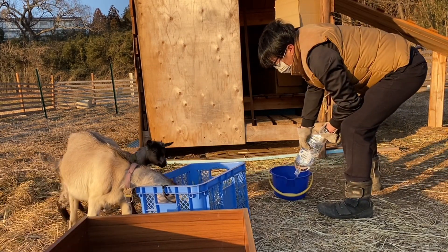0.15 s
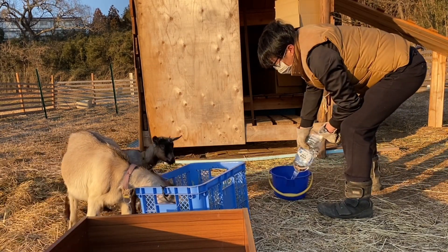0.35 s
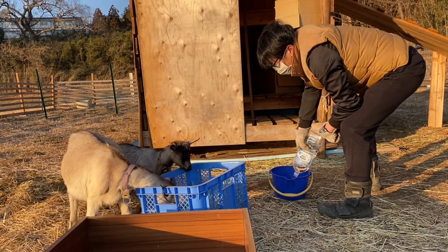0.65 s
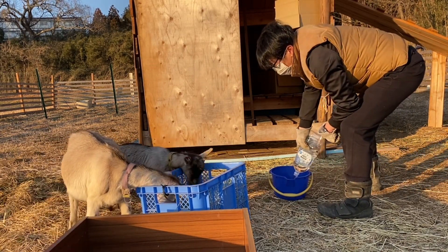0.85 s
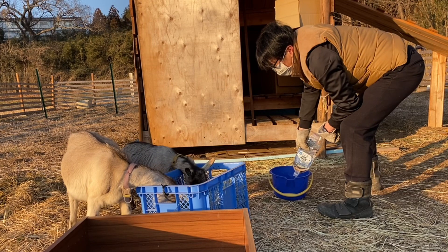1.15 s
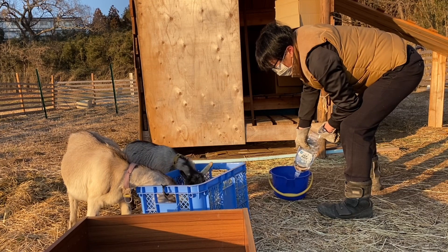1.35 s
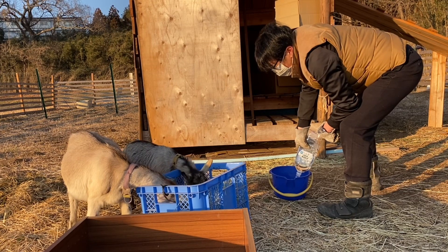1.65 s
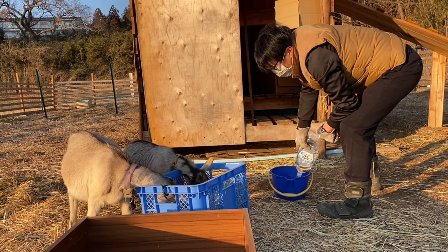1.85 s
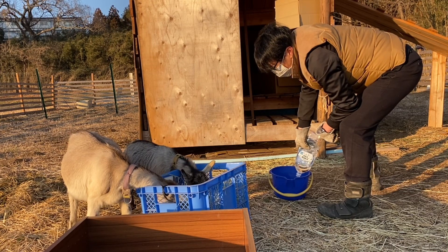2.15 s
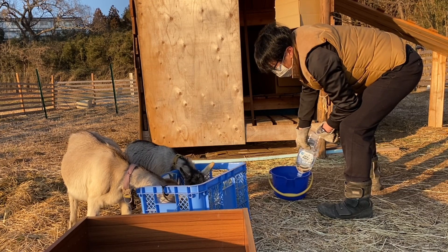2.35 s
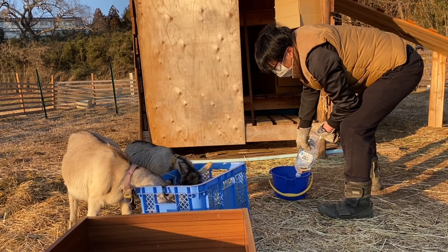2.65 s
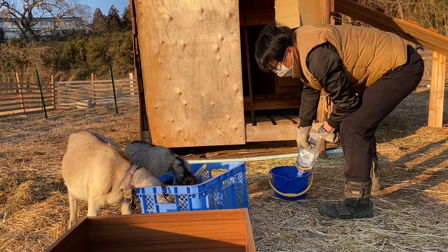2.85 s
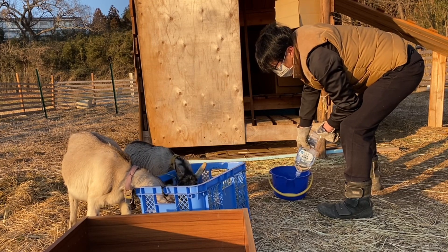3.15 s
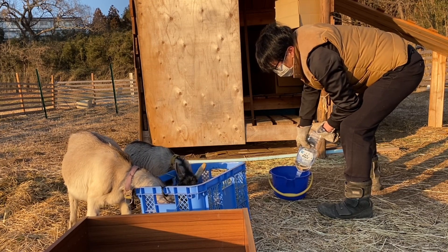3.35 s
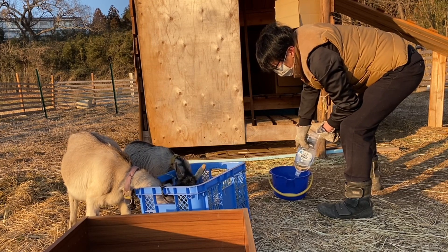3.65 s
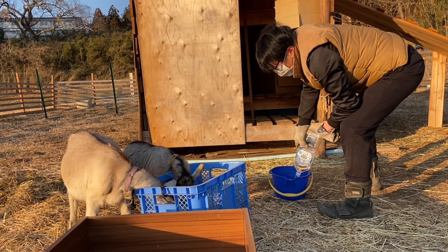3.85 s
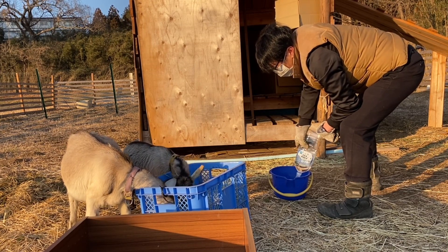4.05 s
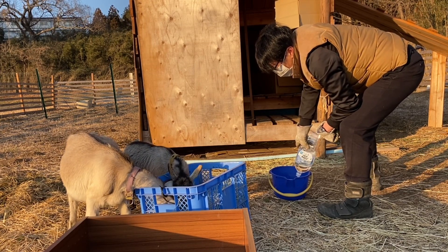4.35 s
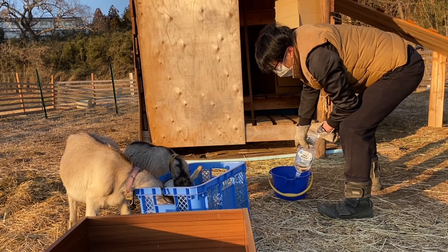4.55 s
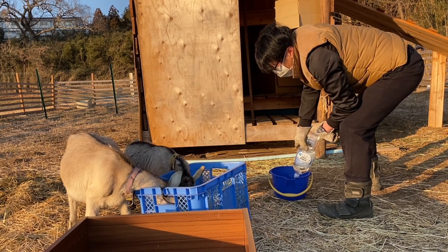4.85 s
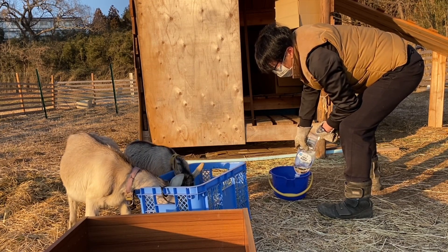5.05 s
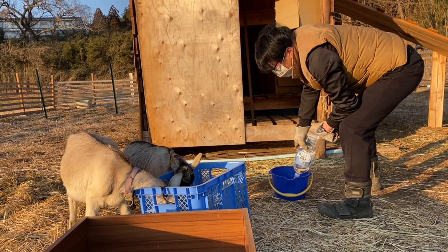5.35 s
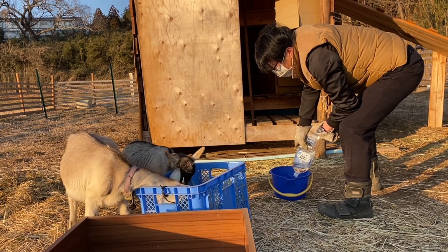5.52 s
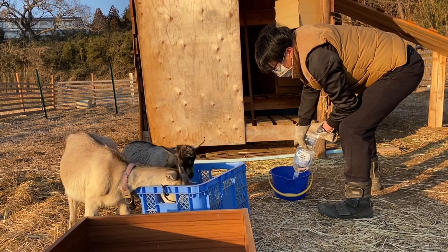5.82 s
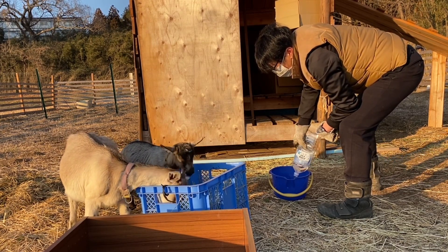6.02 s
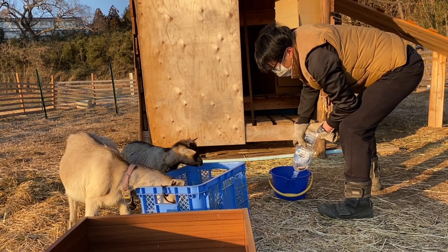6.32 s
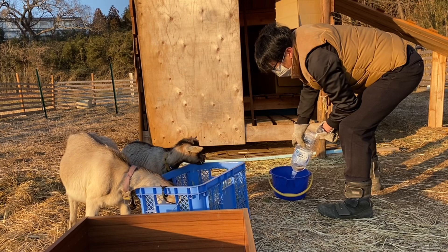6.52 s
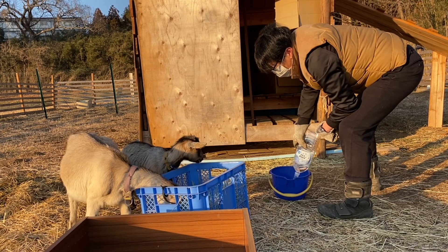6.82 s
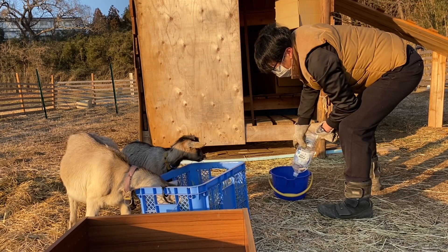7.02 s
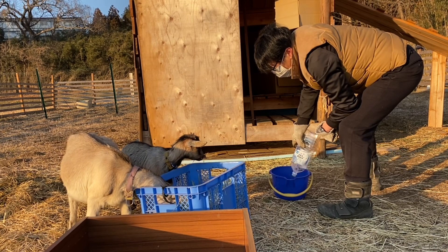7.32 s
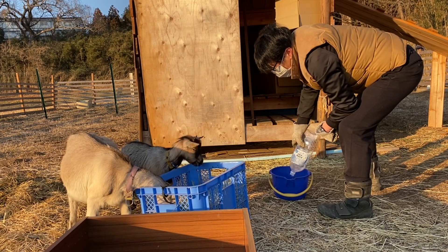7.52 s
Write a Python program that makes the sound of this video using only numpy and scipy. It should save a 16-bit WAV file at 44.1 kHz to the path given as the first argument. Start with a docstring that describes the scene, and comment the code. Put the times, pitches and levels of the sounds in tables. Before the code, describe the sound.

Close outdoor sound of water leaving an upturned plastic bottle into a plastic bucket. Single hollow glugs come first, then quicken into a dense, irregular run of gulps with sharp plastic pops, one hard crack near three seconds, splashes, bubbly bloops and high plinks. After six seconds it thins to spaced soft gulps and drips. Faint low open-air rumble, short reflections from a wooden shed, stereo.

```python
"""A plastic bottle, held upside down, glugs water into a plastic bucket outdoors beside a plywood shed.
At each glug the thin wall snaps (cracking noise, a falling pop) and air rings in the neck as a wobbling tone.
Bubble tones and filtered noise make the splashing stream, drips and bloops; ticking noise makes plastic crinkle.
Short reflections come from ground and shed, over shaped noise for the rumble of open air and a few low thuds."""
import sys
import numpy as np
from scipy import signal
from scipy.fft import rfft, irfft
from scipy.io import wavfile
from scipy.ndimage import uniform_filter1d

SR = 44100
rng = np.random.default_rng(int(sys.argv[2]) if len(sys.argv) > 2 else 0)


def log_audio(samples):
    """Write samples as a 16-bit WAV file to the path given in sys.argv[1]."""
    # one column per channel
    frames = np.atleast_2d(samples).T
    # limit to full scale, then quantise
    limited = np.clip(frames, -1, 1)
    pcm = np.round(limited * 32767).astype(np.int16)
    wavfile.write(sys.argv[1], SR, pcm)


N = 338688
TIME = np.arange(N) / SR
RING = TIME[:SR // 3]  # the time axis of one short sound

# Levels in the tables are relative: each function adds its own trim in dB.
# glugs, the wall snaps and air breaks in:
# [t/s, snap level/dB, snap f/Hz, crack level/dB, pocket level/dB, pocket f/Hz, bottle body level/dB]
GLUG_EVENTS = [(0.37, -31, 1440, -71, -38, 495, -51), (0.697, -43, 1000, -43, -63, 444, -68),
               (0.897, -49, 840, -74, -47.5, 500, -54.5), (1.189, -43, 1100, -50.5, -41, 530, -50.5),
               (1.469, -42, 1310, -48.5, -36.5, 522, -56.5), (1.516, -44.5, 850, -48.5, -40, 533, -50.5),
               (1.761, -37.5, 1460, -57, -74, 586, -56), (1.827, -50, 900, -57, -40.5, 370, -54.5),
               (1.958, -48, 1810, -48.5, -61, 444.4, -57.5), (2.059, -50.5, 2010, -44, -39.5, 427, -56),
               (2.324, -42.5, 1050, -42.5, -46.5, 462, -80), (2.435, -38, 1440, -63, -45, 714, -48),
               (2.552, -45, 830, -45, -41, 400, -52), (2.662, -49.5, 2420, -64, -37, 450, -45.5),
               (2.915, -35, 1320, -48, -45, 437, -51), (3.017, -44.5, 1310, -52, -33, 487, -48.5),
               (3.0484, -21.5, 2570, -21, -46, 382.3, -49), (3.148, -35, 1050, -50, -38, 337, -51),
               (3.2, -41, 1550, -49.5, -47, 460, -59), (3.228, -33, 1660, -47, -36.5, 360, -48.5),
               (3.3046, -27.5, 1590, -68, -73, 400, -56), (3.427, -40.5, 1250, -40.5, -41.5, 392, -46.5),
               (3.506, -34.5, 940, -50, -32, 597, -44.5), (3.674, -39.5, 1140, -63, -38, 355, -49),
               (3.765, -35, 860, -49, -29.5, 514, -46), (3.92, -39, 840, -40.5, -41, 365, -51),
               (4.011, -31.5, 1200, -46.5, -43, 440, -43.5), (4.119, -34, 1190, -37, -41, 473, -51),
               (4.206, -37, 1110, -43, -35.5, 355, -49), (4.352, -42, 850, -41, -41, 357, -45.5),
               (4.435, -27, 1300, -33.5, -30, 350, -43.5), (4.579, -34.5, 850, -44, -40.5, 375, -47.5),
               (4.647, -31, 820, -36, -25.5, 335, -42.5), (4.804, -31.5, 1790, -38.5, -40.5, 437, -48),
               (4.865, -29, 1463, -36, -29.5, 416, -39), (5.037, -38, 840, -39, -39.5, 420, -40),
               (5.108, -24, 1190, -35.5, -30.5, 377, -42), (5.267, -43, 1030, -51.5, -36, 460, -40),
               (5.512, -38, 1100, -53, -37, 463, -43.5), (5.563, -26.5, 1070, -29.5, -32, 456, -40.5),
               (5.736, -35, 870, -71, -34.5, 490, -39.5), (5.956, -53, 890, -52, -42, 360, -48.5),
               (5.987, -32.5, 850, -53, -30.5, 430, -40.5), (6.227, -63, 2460, -45, -40.5, 498, -51),
               (6.7, -56, 860, -44, -37.5, 522, -50), (6.982, -56, 1120, -46, -31.5, 494, -57.5),
               (7.254, -52, 864, -40, -32, 478, -49), (7.507, -54, 1080, -47, -42, 524, -54.5)]
# tone colour of water sloshing around a bubble: [f/Hz, level/dB]
SLOSH_TONE = [(100, -36), (280, -18), (500, 7), (700, -9), (1100, -21.5), (2500, -18.5), (8000, -37)]

CRACK_LEAD_S = .0006  # the wall cracks just before it pops
SLAP_WETNESS = 0.18  # dB the slap loses per dB that the pocket is weaker than the snap
POCKET_LAG_S = 0.00204  # the pocket breaks off just after the snap
POCKET_WOBBLE, WOBBLE_HZ = 0.093, 53.3  # a fresh pocket changes shape: share of its pitch, rate
# a weaker pocket follows, typically at a slightly lower pitch: typical delay, level, typical pitch ratio
SECOND_POCKET_S, SECOND_POCKET_DB, SECOND_POCKET_PITCH_RATIO = .038, -18, 0.97
BODY_ATTACK_S = 0.0025  # the heavy bottle takes a moment to swing
# water let out per glug: level for a 0 dB snap, dB per dB of snap, delay, half length
SLUG_DB, SLUG_GROWTH, SLUG_LAG_S, SLUG_HALF_S = -42, 0.36, 0.016, 0.024
CHURN_S = 0.024  # stirred water goes on gurgling after a slug
CHURN_KEEP = np.exp(-1 / (CHURN_S * SR))  # share of the churning left after one sample
# thrown droplets: level of the earliest against the snap, longest flight, lowest and highest pitch
FLUNG_DB, FLUNG_S, FLUNG_LOW_HZ, FLUNG_HIGH_HZ = -18, .075, 1530, 4630
DROP_GLIDE, DROP_GLIDE_SCATTER = .03, .06  # bend in pitch: average and spread, as natural log of a ratio
DROP_ECHO_S, DROP_ECHO_DB = 0.011, -16  # the shed wall answers each plink
RUMBLE_SWING_DB, RUMBLE_SWINGS_PER_S = 3.5, 7.7  # spread and rate of the random changes in level
TOP_HZ = 16300


def undb(db):
    """Turn decibels into gain, the number a sound is multiplied by."""
    return 10 ** (np.asarray(db) / 20)


def unit(x):
    """Scale a sound to an average strength (rms) of 1."""
    return x / np.sqrt(np.mean(x ** 2))


def add(track, s, sound):
    """Mix a sound into a track at time s."""
    i = max(int(s * SR), 0)
    track[i:i + len(sound)] += sound[:max(N - i, 0)]


def gains(points, size):
    """Draw lines between (f/Hz, level/dB) points to get a gain for each frequency of a spectrum."""
    hz, db = np.transpose(points)
    return undb(np.interp(np.log(np.fft.rfftfreq(size, 1 / SR) + 1), np.log(hz), db))


def colour(x, points):
    """Filter a sound by an outline of (f/Hz, level/dB) points."""
    return irfft(rfft(x) * gains(points, len(x)), len(x))


def walk(rate):
    """Wander smoothly at random, with a spread near 1."""
    k = int(SR / rate)
    steps = np.repeat(rng.standard_normal(N // k + 1), k)
    return unit(uniform_filter1d(steps, k)[:N])


def fade(t60, t=RING):
    """Die away exponentially, by 60 dB in t60 seconds."""
    return np.exp(-np.log(1000) * t / t60)


def bubble(hz, t60, glide, glide_s, attack_s, t=RING):
    """A pocket of air rings; its pitch starts off by the factor exp(-glide) and settles."""
    pitch = hz * np.exp(-glide * np.exp(-t / glide_s))
    tone = np.sin(2 * np.pi * np.cumsum(pitch) / SR)
    return tone * fade(t60, t) * (1 - np.exp(-(t / attack_s) ** 2))


def snaps(ring_db=8, slap_db=0, slap_scatter=0.16, ragged_db=6.5, crack_db=6, crinkle_db=-16):
    """Pressure flips the wall: a crack, a pop that drops in pitch, a wet slap and a short crinkle."""
    # tone colour of the cracking plastic: [f/Hz, level/dB]
    crack_tone = [(300, 4.5), (1200, 6), (2800, 1), (4100, 3.5), (5500, -3), (7500, 1), (10000, -2),
                  (16000, -10.5)]
    # the wet slap darkens as it dies, band by band: [f/Hz, level/dB, typical t60/s]
    slap_bands = [(583, -13, 0.078), (860, -4, 0.064), (1390, 0.5, 0.025), (2100, 2, 0.021),
                  (3010, -5.5, 0.014), (4040, -24.5, 0.0049)]
    out = np.zeros(N)
    for s, db, hz, sharp_db, pocket_db, *_ in GLUG_EVENTS:
        ring = bubble(hz, t60=0.013, glide=-0.32, glide_s=0.0017, attack_s=0.00028)
        lengths = np.exp(slap_scatter * rng.standard_normal(len(slap_bands)))
        slap = sum(undb(band_db) * burst(band_hz, t60 * k)
                   for (band_hz, band_db, t60), k in zip(slap_bands, lengths))
        # the slap comes in uneven spurts, about 350 a second
        spurts = RING[::SR // 350]
        slap = slap * undb(ragged_db * np.interp(RING, spurts, rng.standard_normal(len(spurts))))
        slap = slap * (1 - np.exp(-RING / 0.0019))
        wet_db = slap_db + SLAP_WETNESS * min(pocket_db - db, 0)
        add(out, s, undb(db) * (undb(ring_db) * ring + undb(wet_db) * slap))

        crack = undb(crack_db) * grit(crack_tone, spread_db=2.0) * fade(0.015)
        crinkle = undb(crinkle_db) * grit(crack_tone, spread_db=3.5) * fade(0.18)
        add(out, s - CRACK_LEAD_S, undb(sharp_db) * (crack + crinkle))
    return out


def burst(hz, t60):
    """A band of noise about an octave wide that dies away."""
    band = [(hz / 2, -30), (hz / 1.2, 0), (hz * 1.2, 0), (hz * 2, -30)]
    noise = colour(rng.standard_normal(len(RING)), band)
    decay = fade(t60)
    return unit(noise * decay) * np.sqrt(np.mean(decay ** 2))


def grit(points, spread_db):
    """Dense ticks of uneven size, filtered by an outline of (f/Hz, level/dB) points."""
    sizes = undb(spread_db * np.minimum(rng.exponential(size=len(RING)), 5))
    ticks = rng.standard_normal(len(RING)) * sizes
    return unit(colour(ticks, points))


def gulps(pocket_db=8, body_db=-2, slosh_db=-8, heave_db=-3, intake_db=-13, stir_db=-9, gurgle_db=-15):
    """Air breaks off in the neck as a wobbling pocket, shaking the bottle and shedding small bubbles."""
    # the water-laden bottle swings at these pitches: [typical f/Hz, typical level/dB, t60/s]
    body_modes = [(124, 8.5, 0.21), (157.7, 10, 0.17), (201.8, 10.5, 0.14), (252, 11.5, 0.093),
                  (331.7, 9, 0.12)]
    # tone colour of the deep heave of water: [f/Hz, level/dB]
    heave_tone = [(40, -46), (85, 16.5), (160, -37), (280, 1.5), (500, -10), (1500, -70)]
    out = np.zeros(N)
    lead = int(0.041 * SR)
    for s, db, hz, low_db in pockets():
        wobble = np.exp(POCKET_WOBBLE * np.sin(2 * np.pi * (WOBBLE_HZ * RING + rng.random())))
        pocket = bubble(hz * wobble, t60=0.061, glide=0.072, glide_s=0.0064, attack_s=0.0017)
        body = modes(body_modes, scatter=0.1182) * (1 - np.exp(-RING / BODY_ATTACK_S))
        add(out, s, undb(db + pocket_db) * pocket + undb(low_db + body_db) * body)

        slosh = unit(colour(rng.standard_normal(len(RING)), SLOSH_TONE))
        heave = unit(colour(rng.standard_normal(len(RING)), heave_tone))
        water = undb(db + slosh_db) * slosh + undb(low_db + heave_db) * heave
        add(out, s, water * fade(0.15) * (1 - np.exp(-RING / 0.0004)))

        # the water already stirs while the pocket is forming: a backwards fade
        stir = undb(intake_db) * water + undb(low_db + stir_db) * heave
        add(out, s - lead / SR, (stir * fade(0.11))[:lead][::-1])

        for late, size, strength in rng.random((5, 3)):
            small_hz = 550 * 4 ** size
            small = bubble(small_hz, t60=45 / small_hz, glide=0.307, glide_s=0.03, attack_s=0.0072)
            add(out, s + 0.0053 + 0.036 * late, undb(db + gurgle_db - 10 * late) * strength * small)
    return out


def pockets():
    """Each glug lets in an air pocket, then a weaker one: (t/s, level/dB, f/Hz, bottle body level/dB)."""
    chance = rng.standard_normal((len(GLUG_EVENTS), 2))
    for (s, *_, db, hz, low_db), (late, detune) in zip(GLUG_EVENTS, chance):
        yield s + POCKET_LAG_S, db, hz, low_db
        yield (s + SECOND_POCKET_S * np.exp(.15 * late), db + SECOND_POCKET_DB,
               hz * SECOND_POCKET_PITCH_RATIO * np.exp(0.11 * detune), low_db + SECOND_POCKET_DB)


def modes(table, scatter):
    """A struck body rings at several pitches; the shifting water changes them and their levels each time."""
    total = 0
    for (hz, db, t60), (a, b, c) in zip(table, rng.standard_normal((len(table), 3))):
        tone = np.sin(2 * np.pi * hz * np.exp(scatter * a) * RING)
        total = total + np.sign(c) * undb(db + 2 * b) * tone * fade(t60)
    return total


def stream(trickle_db=-1.5, slug_db=-2, wash_db=-9, gurgle_db=-8.5, spray_db=3, slug_spray_db=-13,
           flutter_db=2, sputter_db=2.5):
    """Falling water churns up bubbles and throws a fine spray; each slug makes both swell and leaves a gurgle."""
    # the thin stream between the slugs: [t/s, trickle level/dB, fine spray level/dB]
    stream_levels = [(0.0, -61, -74), (0.3, -63.5, -68.5), (0.75, -64, -66), (0.9, -62.5, -68.5),
                     (1.281, -60, -70.5), (1.56, -62.5, -75), (2.12, -55.5, -64.5), (2.7, -57.5, -68),
                     (2.86, -62.5, -68.5), (3.101, -54, -68.5), (3.38, -60, -73), (3.52, -55, -69),
                     (3.7, -58, -66), (3.84, -63.5, -73), (4.021, -60.5, -66.5), (5.05, -57.5, -69.5),
                     (5.33, -62, -64), (5.6, -56.5, -61), (5.819, -63, -64.5), (6.05, -62, -77),
                     (6.39, -67, -68), (6.89, -64, -69), (7.68, -66, -72.5)]
    # tone colours of the splash, the spray and the gurgle: [f/Hz, level/dB]
    splash_tone = [(120, -19), (200, 2.5), (549, -11), (680, -15), (1220, -9), (1350, -14), (2090, -10),
                   (4850, -21), (6000, -27), (7800, -16), (13200, -120)]
    spray_tone = [(1800, -22), (3500, 18.5), (5000, 15.5), (7000, 12.5), (11000, 18.5), (16000, 16)]
    gurgle_tone = [(600, 3), (1400, -1), (3200, -4)]
    s, *columns = np.transpose(stream_levels)
    trickle, mist = (undb(np.interp(TIME, s, c) + sputter_db * walk(24)) for c in columns)
    swell = slugs()
    thin = undb(trickle_db) * trickle
    fizz = bubble_cloud(thin, count=7000, low_hz=378, high_hz=7710, cycles=34)
    fizz = unit(colour(fizz, splash_tone))
    flow = np.hypot(undb(-18) * thin, undb(slug_db) * swell)
    cloud = bubble_cloud(flow, count=3500, low_hz=384.7, high_hz=7490, cycles=33.5)
    cloud = unit(colour(cloud, splash_tone))
    wash = unit(colour(rng.standard_normal(N), splash_tone))
    ticks = rng.standard_normal(N) * undb(3.5 * np.minimum(rng.exponential(size=N), 7))
    # the churning follows the flow but dies down slowly
    churn = signal.lfilter([1 - CHURN_KEEP], [1, -CHURN_KEEP], flow)
    gurgle = bubble_cloud(churn, count=1800, low_hz=512, high_hz=3210, cycles=53)
    gurgle = unit(colour(gurgle, gurgle_tone))
    splash = thin * (fizz + undb(-6.5) * wash)
    splash += flow * (cloud + undb(wash_db) * wash)
    splash += undb(gurgle_db) * churn * gurgle
    spray_level = np.hypot(undb(spray_db) * mist, undb(slug_spray_db) * swell)
    spray = spray_level * unit(colour(ticks, spray_tone))
    return (splash + spray) * undb(flutter_db * walk(130))


def slugs():
    """Strength of the water landing over time: a small slug after every glug, and the big ones."""
    # the biggest slugs of water land in the bucket: [centre t/s, level/dB, half length/s]
    big_slugs = [(0.032, -47.5, 0.013), (0.371, -38, 0.0045), (0.491, -53.5, 0.082), (0.829, -45.5, 0.018),
                 (0.871, -46, 0.014), (0.961, -49, 0.013), (1.158, -46, 0.036), (1.486, -45, .01),
                 (1.705, -51, .01), (1.734, -46, .008), (1.765, -42, .009), (1.837, -48.5, .014),
                 (2.264, -48, 0.014), (2.437, -43, .018), (2.478, -44, 0.018), (2.666, -46, 0.025),
                 (2.762, -46, 0.013), (2.933, -47, 0.025), (3.022, -37.5, 0.013), (3.228, -44, 0.013),
                 (3.469, -43.5, .023), (3.736, -50, 0.023), (3.982, -45.5, 0.019), (4.216, -48, 0.018),
                 (4.433, -40, .007), (5.416, -47, 0.0059), (5.527, -41, .03), (5.614, -48.5, .019),
                 (6.02, -48, .035), (6.475, -49.5, 0.012), (6.961, -49.5, 0.029), (7.258, -45, .013)]
    power = np.zeros(N)
    let_out = [(s + SLUG_LAG_S, SLUG_DB + SLUG_GROWTH * db, SLUG_HALF_S) for s, db, *_ in GLUG_EVENTS]
    for s, db, half in big_slugs + let_out:
        t = np.arange(-3 * half, 3 * half, 1 / SR)
        t = t[s + t >= 0]
        add(power, s + t[0], (undb(db) * np.exp(-(t / half) ** 2)) ** 2)
    return np.sqrt(power)


def bubble_cloud(flow, count, low_hz, high_hz, cycles):
    """Countless small bubbles, crowding where the flow is strong: most are faint, a few stand out."""
    out = np.zeros(N)
    chance = rng.random((count, 4))
    starts = np.searchsorted(np.cumsum(flow) / flow.sum(), chance[:, 0]) / SR
    for s, (_, size, strength, life) in zip(starts, chance):
        hz = low_hz * (high_hz / low_hz) ** size
        t60 = cycles * (.5 + life) / hz
        height = hz ** .85 / (.11 + strength) ** .8
        add(out, s, height * bubble(hz, t60, 0.11, t60 / 2, 1.3 / hz, RING[:int(t60 * SR)]))
    # even out the crowding, since the caller multiplies by the flow
    return unit(out / np.sqrt(uniform_filter1d(flow, SR // 50)))


def bloops(bloop_db=0, rise=0.23, slosh_db=-13):
    """Large trapped bubbles each rise in pitch by their own amount and stir the water around them."""
    # big bubbles bloop up in the bucket: [t/s, level/dB, f/Hz, t60/s]
    bloop_events = [(.372, -24, 433, 0.04), (0.482, -42, 583, 0.083), (0.52, -40, 607, 0.064),
                    (0.953, -33.5, 434, 0.031), (1.668, -44, 590, 0.066), (2.045, -35.5, 463, 0.063),
                    (2.08, -36, 427, 0.033), (2.158, -33.5, 537, 0.077), (2.19, -27, 440, 0.052),
                    (2.69, -46, 422, 0.077), (2.747, -38.5, 516, 0.11), (3.183, -22, 530, 0.025),
                    (4.022, -30, 466, 0.098), (4.136, -19, 474, 0.048), (4.683, -28.5, 450, 0.035),
                    (4.902, -26, 436, 0.067), (5.055, -43, 380, .04), (5.217, -41, 585, 0.12),
                    (5.244, -33.5, 482, 0.13), (5.525, -27.5, 186, 0.11), (5.608, -33.5, 530, 0.096),
                    (6.068, -44, 536, 0.14), (6.506, -38, 547, 0.11), (6.685, -39, 211, 0.1),
                    (6.715, -39, 514, 0.095), (6.94, -41.5, 511, 0.15), (7.283, -34.5, 173, 0.043),
                    (7.421, -43, 528, 0.07), (7.559, -40.5, 550, 0.067)]
    out = np.zeros(N)
    for (s, db, hz, t60), steep in zip(bloop_events, rng.random(len(bloop_events))):
        ring = bubble(hz, t60, glide=2 * rise * steep, glide_s=0.1 * t60, attack_s=0.0016)
        slosh = unit(colour(rng.standard_normal(len(RING)), SLOSH_TONE)) * fade(t60)
        add(out, s, undb(db + bloop_db) * (ring + undb(slosh_db) * slosh))
    return out


def drops(drop_db=3.0, spatter_db=-15):
    """A drop spatters and traps a bubble that plinks with its own bend in pitch; small ones die sooner."""
    # the clearest drops trap a bubble in the bucket: [t/s, level/dB, f/Hz]
    clear_drops = [(0.164, -38, 2030), (0.606, -42.5, 4220), (1.327, -40, 2750), (1.588, -42.5, 4640),
                   (1.764, -37, 3070), (1.958, -42.5, 2460), (2.037, -47, 1410), (2.127, -50, 1170),
                   (2.147, -37, 4800), (2.33, -35.5, 4150), (2.641, -40.5, 3570), (2.822, -35, 5360),
                   (3.02, -38, 3320), (3.0485, -27, 1494), (3.23, -37.5, 1000), (3.321, -39, 3400),
                   (3.438, -33, 1674), (3.44, -37, 2280), (3.477, -39, 1160), (3.54, -37.5, 3620),
                   (3.764, -38, 2190), (3.92, -45, 1766), (4.1195, -32, 2060), (4.198, -33.5, 3280),
                   (4.21, -39, 3260), (4.288, -37, 3050), (4.294, -38.5, 3980), (4.4705, -40, 3200),
                   (4.491, -49, 1120), (4.755, -34.5, 2040), (4.84, -40.5, 1246), (5.108, -33, 3970),
                   (5.153, -40, 3700), (5.502, -37, 3660), (5.53, -37, 2440), (6.2475, -29.5, 2590),
                   (6.343, -48.5, 1150), (6.5325, -32, 2580), (6.541, -40, 2570), (6.613, -46, 983),
                   (6.621, -41, 3440), (6.698, -31, 3810), (7.199, -45, 1850), (7.5579, -43.5, 1730)]
    out = np.zeros(N)
    for s, db, hz in clear_drops + flung_drops(count=3):
        glide = DROP_GLIDE + DROP_GLIDE_SCATTER * rng.standard_normal()
        plink = bubble(hz, t60=60 / hz, glide=glide, glide_s=.006, attack_s=.001)
        add(out, s + DROP_ECHO_S, undb(db + drop_db + DROP_ECHO_DB) * plink)
        band = [(hz / 3, -22), (hz, 0), (hz * 1.5, -7), (hz * 3, -28)]
        spatter = unit(colour(rng.standard_normal(len(RING)), band))
        add(out, s, undb(db + drop_db) * (plink + undb(spatter_db) * spatter * fade(0.064)))
    return out


def flung_drops(count):
    """Every glug throws a few droplets; the later they land, the fainter: (t/s, level/dB, f/Hz)."""
    return [(s + FLUNG_S * late,
             db + FLUNG_DB - 7 * late,
             FLUNG_LOW_HZ * (FLUNG_HIGH_HZ / FLUNG_LOW_HZ) ** size)
            for s, db, *_ in GLUG_EVENTS for late, size in rng.random((count, 2))]


def crinkles(crinkle_db=4, rustle_db=-16):
    """Tiny creases in the plastic give way with a bright tick and a brief rustle."""
    # the gripped plastic crinkles: [t/s, level/dB]
    crinkle_events = [(1.126, -41.5), (1.3286, -44), (1.4163, -37), (1.724, -44), (2.1455, -48),
                      (3.003, -49), (3.181, -44.5), (3.663, -50), (5.088, -48.5), (5.247, -46),
                      (6.507, -48.5), (7.06, -52)]
    # tone colour of the crinkling: [f/Hz, level/dB]
    crinkle_tone = [(800, -31), (3000, 13), (7000, 24), (11000, 26), (16000, 15)]
    out = np.zeros(N)
    shape = fade(.012) + undb(rustle_db) * fade(0.087)
    for s, db in crinkle_events:
        add(out, s, undb(db + crinkle_db) * grit(crinkle_tone, spread_db=6.5) * shape)
    return out


def yard(x, scatter_db=-13, tail_db=-19, tail_t60=0.23):
    """The shed returns two distinct echoes amid scattered ones; open air leaves only a brief tail."""
    # reflections from the plywood door and the back of the shed: [delay t/s, level/dB]
    shed_echoes = [(.0066, -22.5), (0.0173, -32)]
    scatter = rng.standard_normal(len(RING)) * fade(0.037) * (RING > .002)
    early = undb(scatter_db) * scatter / np.linalg.norm(scatter)
    for delay, db in shed_echoes:
        early[int(delay * SR)] += undb(db)
    tail_tone = [(100, -0.5), (2000, 3.0), (6000, 1.0), (15000, 6.0)]
    out = []
    # left and right share the early echoes but have their own tails
    for noise in rng.standard_normal((2, len(RING))):
        tail = colour(noise, tail_tone) * fade(tail_t60) * (RING > .012)
        response = early + undb(tail_db) * tail / np.linalg.norm(tail)
        out.append(x + signal.fftconvolve(x, response)[:N])
    return np.array(out)


def ports(pair):
    """The two microphone ports agree in phase in the bass, and drift apart in the treble."""
    # level balance of the ports: [f/Hz, left minus right level/dB]
    port_balance = [(100, -1), (200, 2), (380, -3), (700, 1.5), (1300, 1.5), (2400, 1.5), (4400, 2),
                    (9000, 0.5)]
    # how far the left port leads: [f/Hz, phase/rad]
    port_phase = [(0, 0), (4500, 0.2), (7500, -.3), (9000, -3.5), (13700, -9), (16000, -11)]
    # each side takes half of the difference
    tilt = np.sqrt(gains(port_balance, N))
    lead = np.exp(.5j * np.interp(np.fft.rfftfreq(N, 1 / SR), *np.transpose(port_phase)))
    return irfft(rfft(pair) * np.array([tilt * lead, 1 / (tilt * lead)]), N)


def open_air(rumble_db=5, side_db=-11, hiss_db=-66):
    """Filtered noise gives a wavering low rumble and a faint distant hiss; low tones give a few soft thuds."""
    # low rumble of the open air over time: [t/s, level/dB]
    rumble_levels = [(0.0, -65.5), (0.96, -65), (2.2, -60.5), (2.87, -56), (3.6, -62), (4.96, -59.5),
                     (5.22, -61), (7.68, -61)]
    # tone colour of the rumble: [f/Hz, level/dB]
    rumble_tone = [(20, -24), (40, -6), (62, 3), (100, -6), (180, -11), (400, -31.5), (1000, -84)]
    # soft low thuds: [t/s, level/dB, f/Hz]
    thud_events = [(2.392, -42, 59), (2.473, -37, 58.5), (2.619, -39, 55.5), (2.832, -29, 56.4),
                   (2.842, -37, 92), (3.25, -37, 62), (6.92, -43, 60.3)]
    mid, side = (unit(colour(n, rumble_tone)) for n in rng.standard_normal((2, N)))
    # the side part has opposite sign left and right, which widens the rumble
    low = mid + undb(side_db) * side * np.array([[1], [-1]])
    low = low * undb(np.interp(TIME, *np.transpose(rumble_levels)) + rumble_db)
    low = low * undb(RUMBLE_SWING_DB * walk(RUMBLE_SWINGS_PER_S))
    thuds = np.zeros(N)
    for s, db, hz in thud_events:
        add(thuds, s, undb(db + 6) * bubble(hz, t60=.17, glide=-.1, glide_s=.03, attack_s=.018))
    hiss_tone = [(100, -41.0), (500, -13.0), (2000, -22.5), (6000, -32), (16000, -69)]
    hiss = [unit(colour(n, hiss_tone)) for n in rng.standard_normal((2, N))]
    return low + thuds + undb(hiss_db) * np.array(hiss)


def scene():
    """Bottle and bucket sound in the yard, over the open air."""
    bottle = snaps() + crinkles() + gulps()
    bucket = drops() + bloops() + stream()
    return ports(yard(bottle + bucket)) + open_air()


def record(dry):
    """The recorder cuts the top of the treble with a steep filter."""
    return signal.sosfilt(signal.ellip(8, .2, 70, TOP_HZ, fs=SR, output="sos"), dry)


dry = scene()
out = record(dry)
log_audio(out)
```